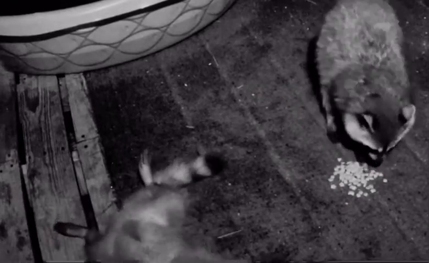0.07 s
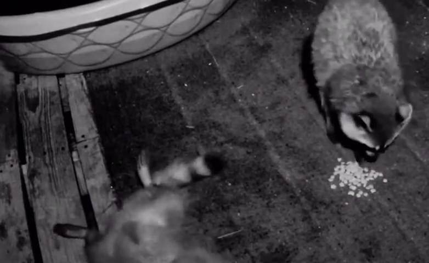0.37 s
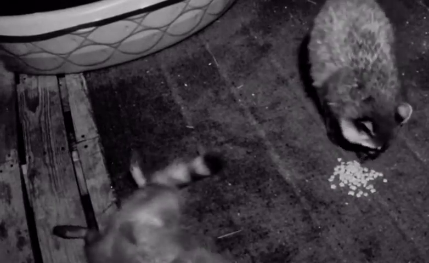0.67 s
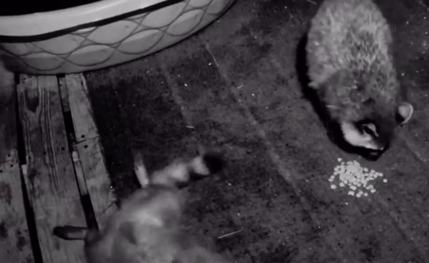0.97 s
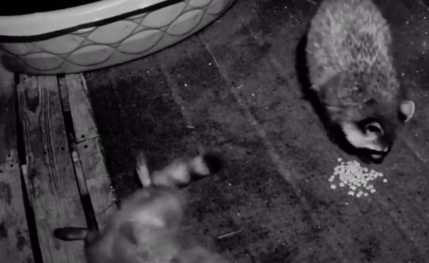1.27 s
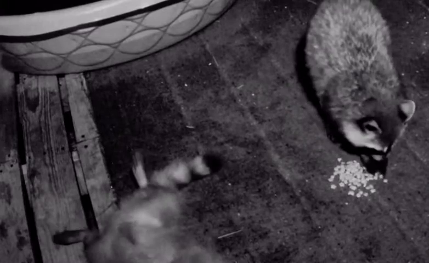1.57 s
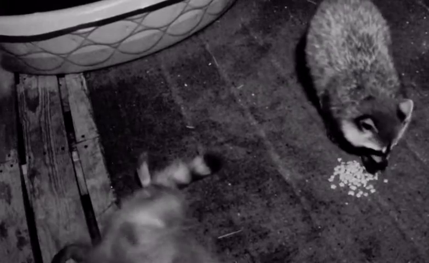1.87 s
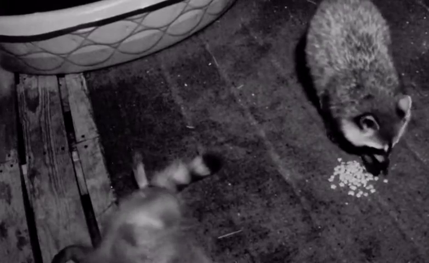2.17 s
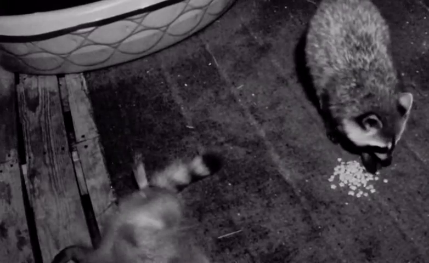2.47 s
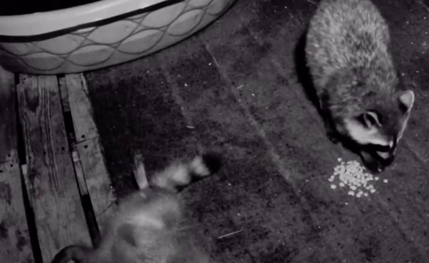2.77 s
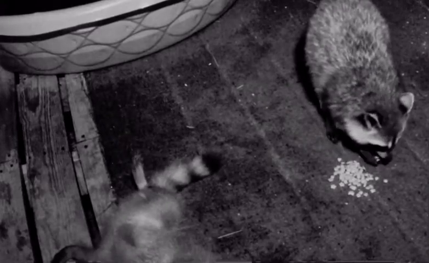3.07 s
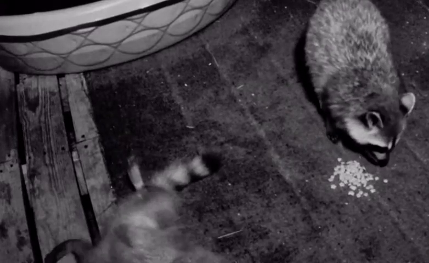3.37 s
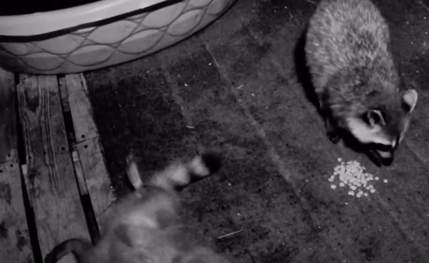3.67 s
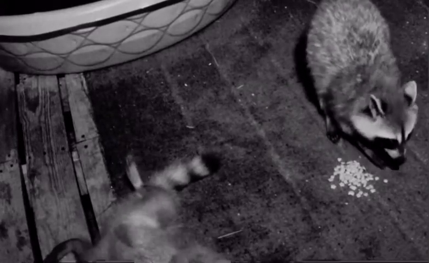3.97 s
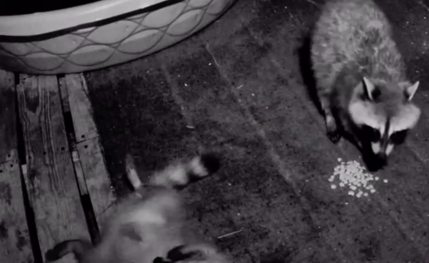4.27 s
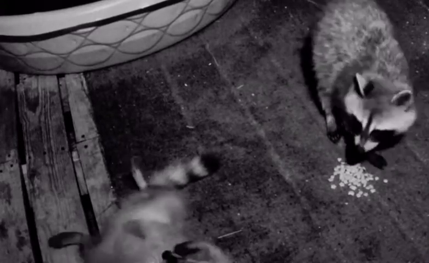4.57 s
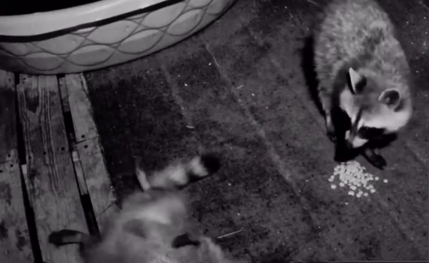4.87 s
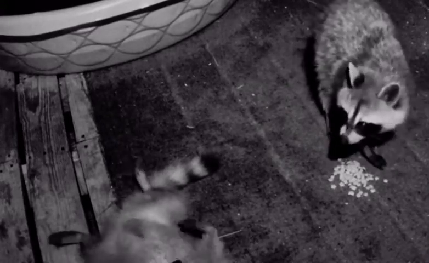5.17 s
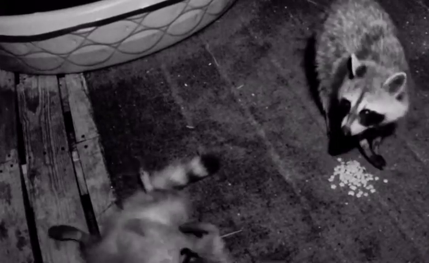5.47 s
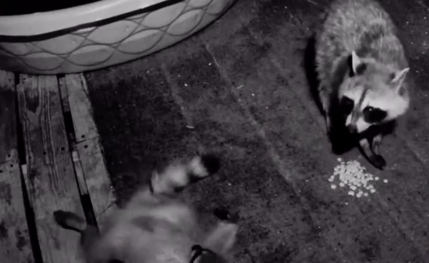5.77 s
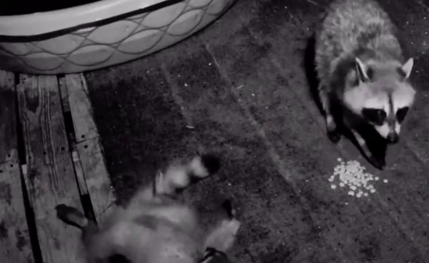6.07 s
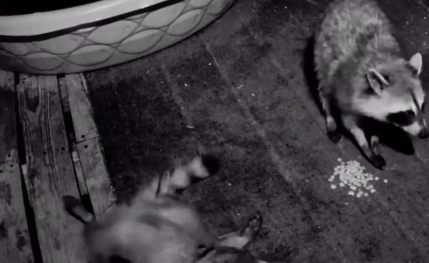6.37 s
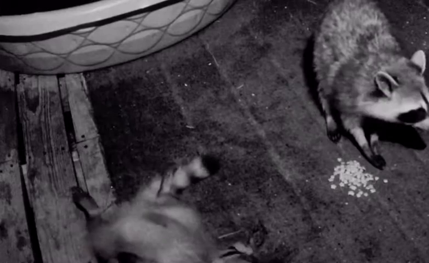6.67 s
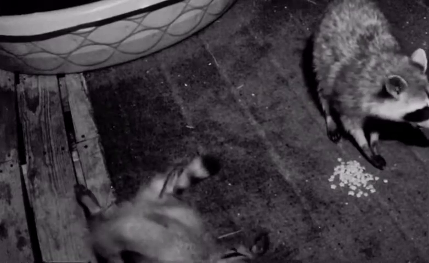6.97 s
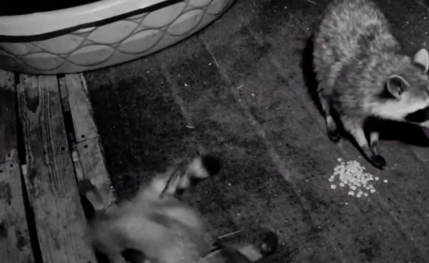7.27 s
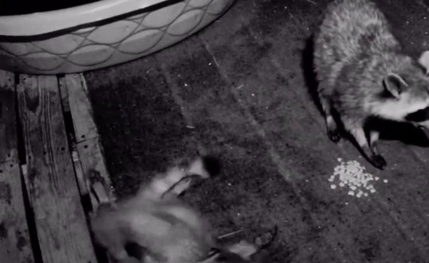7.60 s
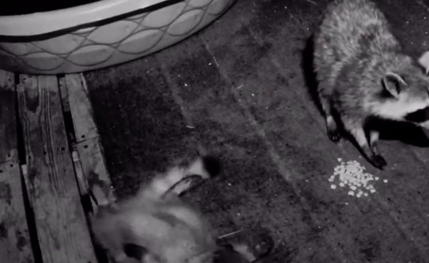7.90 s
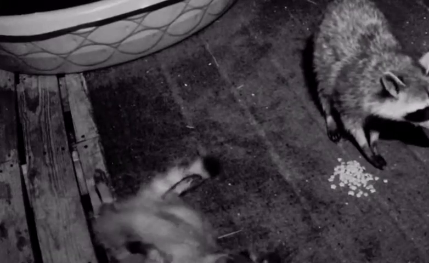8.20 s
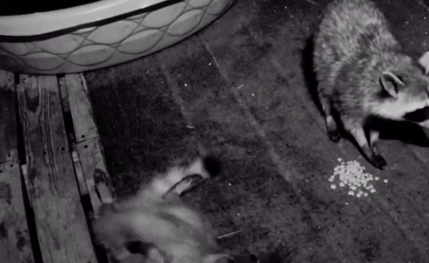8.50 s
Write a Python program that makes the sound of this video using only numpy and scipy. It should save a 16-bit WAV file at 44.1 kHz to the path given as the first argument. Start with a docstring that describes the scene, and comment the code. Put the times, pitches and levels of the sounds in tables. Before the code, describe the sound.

One sharp knock and a few soft bumps on wooden boards, with faint raccoon paw scuffs over a low fan hum and distant crickets.

```python
"""Two raccoons feeding on a wooden porch at night

One sharp knock and a few soft bumps ring in the boards. Paws and dry food scuff and crackle
faintly, in bursts of tiny clicks. A fan motor hums over a low rush of air, and two far crickets
chirp. Heard through a small camera microphone, the sound keeps cutting out for an instant."""
import sys
import numpy as np
from scipy import signal
from scipy.fft import rfft, irfft
from scipy.io import wavfile
from scipy.ndimage import uniform_filter1d

SR = 44100
rng = np.random.default_rng(int(sys.argv[2]) if len(sys.argv) > 2 else 0)


def generate_wav(sig):
    """Save sig (samples, or channels by samples) to the path in sys.argv[1] as 16-bit PCM at SR."""
    pcm = np.round(np.clip(np.atleast_2d(sig).T, -1, 1) * 32767).astype(np.int16)
    wavfile.write(sys.argv[1], SR, pcm)


N = 385434


def from_db(db):
    """Turn decibels (dB) into a number to multiply a sound by."""
    return 10 ** (np.asarray(db) / 20)


def rms_one(x):
    """Scale a sound so that its average strength (rms) is 1."""
    return x / np.sqrt(np.mean(x ** 2) + 1e-20)


def at_hz(points, hz):
    """Read between the rows of a frequency table, giving each octave equal room."""
    frequencies, values = np.transpose(points)
    return np.interp(np.log(np.maximum(hz, 1)), np.log(frequencies), values)


def keep_band(x, hz, kind, order=2):
    """Keep the "low" part of a sound, the "high" part or a "band" in between."""
    sos = signal.butter(order, np.clip(hz, 10, .45 * SR), kind, fs=SR, output="sos")
    return signal.sosfilt(sos, x)


def coloured(spectrum, size):
    """Noise of strength 1, with its balance of bass and treble set by a table."""
    white = rfft(rng.standard_normal(size))
    hz = np.arange(len(white)) * SR / size
    return rms_one(irfft(white * from_db(at_hz(spectrum, hz)), size))


def drift(rate):
    """A wandering curve that heads for a new random value `rate` times a second."""
    targets = rng.standard_normal(4000)
    return np.interp(np.arange(N) / SR * rate, np.arange(len(targets)), targets)


def fan(turns_per_s=56.06, housing_hz=1206, housing_width_hz=78, wander=0.001, flutter=0.2):
    """The rotor rubs once a turn, so its housing buzzes over mains hum and moving air."""
    # Tones of the buzz. Each row: vibrations per turn, level in dB.
    buzz_tones = [(2, -95), (17, -91.5), (20, -80.5), (21, -73), (22, -74.5), (23, -87), (24, -89),
                  (26, -92), (29, -87.5), (31, -86.5), (34, -92)]
    # Hum of the power supply. Each row: pitch in Hz, level in dB.
    mains_tones = [(60, -104), (120, -98.5)]
    # Rush of air. Each row: frequency in Hz, relative level in dB.
    air_spectrum = [(25, -29.5), (60, -18.5), (110, -10), (200, -4.5), (330, 3), (600, 0), (900, 0),
                    (1200, -0.5), (1450, -6.5), (2000, -11), (3500, -18), (5800, -17.5), (6600, -25),
                    (7400, -33.5)]
    t, buzz = np.arange(N) / SR, 0
    turns = np.cumsum(turns_per_s * (1 + wander * drift(9))) / SR
    for per_turn, db in buzz_tones:
        # The housing delays tones above its own pitch.
        lag = np.arctan(2 * (per_turn * turns_per_s - housing_hz) / housing_width_hz)
        unsteady = 1 + flutter * (drift(9) + 1j * drift(4.6))
        buzz += from_db(db) * np.real(unsteady * np.exp(1j * (2 * np.pi * per_turn * turns - lag)))
    mains = sum(from_db(db) * np.sin(2 * np.pi * hz * t) for hz, db in mains_tones)
    air = from_db(-69 + 0.43 * drift(8.5)) * coloured(air_spectrum, N)
    return np.sqrt(2) * (buzz + mains) + air


def cricket(bouts, hz, width_hz, length_s, db, note_hz, note_db, jitter_s=0.0065, echo_share=0.034):
    """Distance and leaves smear each chirp into a rough swell around the wing's note, plus echo."""
    def band(centre, width):
        """A narrow band of noise sounds like a rough tone."""
        edges = [centre - width / 2, centre + width / 2]
        return rms_one(keep_band(rng.standard_normal(N), edges, "band"))

    t = np.arange(N) / SR
    beats = np.concatenate([np.linspace(first, last, count) for first, last, count in bouts])
    chirps = beats + jitter_s * rng.standard_normal(len(beats))
    swell = sum(np.exp(-((t - s) / (length_s / 2)) ** 2) for s in chirps)
    tone = band(hz, width_hz) + from_db(note_db) * band(note_hz, 40)
    return from_db(db + 0.88 * drift(3.7)) * np.sqrt(np.minimum(swell, 1) + echo_share) * tone


def crickets():
    """Two crickets keep their own beats but grow louder and softer together."""
    # Runs of chirps, per cricket. Each row: first and last chirp in seconds, number of chirps.
    low_bouts = [(.16, 1.32, 5), (1.76, 2.56, 4), (2.98, 3.44, 3), (4.07, 6.04, 8), (6.52, 6.52, 1),
                 (7.2, 7.7, 3), (8.1, 8.64, 3)]
    high_bouts = [(.05, 1.0, 6), (1.39, 3.42, 13), (3.97, 6.56, 15), (6.97, 8.65, 11)]
    # How strongly they sing. Each row: time in seconds, change of level in dB.
    singing = [(0, -1.5), (2.6, -2), (4.5, 4.5), (5.8, 0.5), (8.74, -1)]
    low = cricket(low_bouts, hz=5006, width_hz=330, length_s=0.13, db=-83.5, note_hz=5100, note_db=-7.5)
    high = cricket(high_bouts, hz=5410, width_hz=420, length_s=0.11, db=-86, note_hz=5370, note_db=-1)
    effort = from_db(np.interp(np.arange(N) / SR, *np.transpose(singing)))
    return effort * (low + high)


def porch_echo(t, build_s=0.00059):
    """Sound bounces between deck and wall, building up fast and lasting longest in the bass."""
    # Tone of the echo. Each row: frequency in Hz, relative level in dB.
    spectrum = [(30, -27.5), (100, -23), (170, -10), (260, 6), (450, 1.5), (720, -5), (1100, 1.5),
                (2000, -4), (3000, -6.5), (3800, -17), (5500, -14), (7200, -10)]
    # Length of the echo. Each row: frequency in Hz, seconds to fade by 60 dB.
    fades = [(100, 1), (250, 0.26), (600, 0.29), (1500, 0.25), (3000, .2), (6000, 0.27)]
    noise, echo = rfft(coloured(spectrum, len(t))), 0
    hz = np.arange(len(noise)) * SR / len(t)
    centres, fade_times = np.transpose(fades)
    for share, fade_s in zip(np.eye(len(centres)), fade_times):
        band = irfft(noise * at_hz(np.c_[centres, share], hz), len(t))
        echo += band * from_db(-60 * t / fade_s)
    return echo * (1 - np.exp(-t / build_s))


def knocks(glide_s=0.0132, crack_s=0.0087, snap_s=0.0001, thud_band_hz=(40, 188)):
    """Each blow touches, hits and settles, making the boards crack and ring. Soft blows are dull."""
    # Tones of the boards. Each row: pitch in Hz, relative level in dB, seconds to fade by 60 dB.
    board_tones = [(107.6, -21, .34), (168.4, -14.5, 0.32), (248, -5.5, .29), (276, -3, 0.15),
                   (322, -1, .23), (403, -12.5, .22), (494.5, -8.5, 0.32), (565, -0.5, 0.14),
                   (872, -8, .15), (990, -1, 0.094), (1043, -7.5, 0.12), (1067, -8, 0.065),
                   (1310, -3, 0.26), (1306, -2, 0.091), (1625, -7.5, .15), (1732, -5, 0.14), (1925, 4, .14),
                   (2135, -5, 0.19), (2165, -12, 0.24), (2590, -17, .15), (2664, -11, .15),
                   (2995, -2.5, 0.13), (3080, -22.5, 0.19), (4170, -10, 0.13)]
    # Blows on the boards. Each row: start in seconds, level in dB, seconds from touch to main hit,
    # hardness from 0 to 1, share of the treble range kept at each next contact,
    # change to the crack in dB, change to the thud in dB.
    blows = [(0.1958, -55.5, 0.012, 0.62, 1, 0, -20), (2.5, -50.5, .016, 0.3, 0.61, -9, 0),
             (3.7021, -18.5, .0066, 0.95, 1.0, 0, -18.5), (4.493, -39, .019, 0.55, .58, -9.5, 6.5),
             (4.88, -53.5, .012, 0.28, .75, -14, -14)]
    # Touch, main hit and settling of a fully hard blow. Each row: delay (the main hit is at 1),
    # relative level in dB, lowest and highest Hz, change to the crack in dB, its starting Hz.
    contacts = [(0, 1, 1870, 4100, -1.5, 2878), (1, -0.4, 380, 4160, 0, 1657),
                (2.62, -9, 200, 2000, 5.5, 1660)]
    t, out = np.arange(SR // 2) / SR, np.zeros(N)
    ring = sum((-1) ** k * from_db(db - 60 * t / fade_s) * np.sin(2 * np.pi * hz * t)
               for k, (hz, db, fade_s) in enumerate(board_tones))
    snap = keep_band(np.exp(-t / snap_s), 500, "high")

    def body(low_hz, high_hz):
        """Ring and echo, in the range of pitches that a contact sets going."""
        sound = from_db(-18.5) * ring + from_db(-5.5) * porch_echo(t)
        return keep_band(keep_band(sound, low_hz, "high", order=1), high_hz, "low", order=4)

    def crack(start_hz, high_hz):
        """High bending waves outrun low ones in a plank, so the crack falls in pitch."""
        cycles = start_hz * glide_s * (1 - np.exp(-t / glide_s))
        bending = np.sin(2 * np.pi * cycles) * np.exp(-(t / crack_s) ** 4)
        click = keep_band(snap, 1.56 * high_hz, "low", order=4)
        return from_db(-4) * keep_band(bending, 184, "high") + from_db(2) * click

    for s, db, lag_s, hardness, kept, sharp_db, thud_db in blows:
        for k, (delay, contact_db, low_hz, high_hz, crack_db, crack_hz) in enumerate(contacts):
            bright = hardness * kept ** k
            sound = body(hardness * low_hz, bright * high_hz)
            sound += from_db(sharp_db + crack_db) * crack(bright * crack_hz, bright * high_hz)
            add(out, s + delay * lag_s, from_db(db + contact_db) * sound)
        # The whole deck gives under the main hit with a thud.
        add(out, s + lag_s, from_db(db + thud_db) * body(*thud_band_hz))
    return out


def add(out, s, sound):
    """Mix a sound in, starting at s seconds."""
    start = int(np.clip(round(s * SR), 0, N - 1))
    out[start:start + len(sound)] += sound[:N - start]


def crunch(length_s, hz, clicks_per_s=3000, spread_db=2.5, echo_fade_s=0.19, width=1.34):
    """A fading burst of tiny uneven clicks, blurred by the porch's echo."""
    t = np.arange(SR // 3) / SR
    clicks = (rng.random(len(t)) < clicks_per_s / SR) * rng.standard_normal(len(t))
    clicks *= from_db(spread_db * rng.standard_normal(len(t)))
    clicks *= np.clip(1 - t / length_s, 0, 1)
    tail = rng.standard_normal(len(t)) * from_db(-60 * t / echo_fade_s)
    echo = from_db(-27.5) * signal.fftconvolve(clicks, tail)[:len(t)]
    burst = keep_band(clicks + echo, [hz / width, hz * width], "band")
    return burst / np.sqrt(np.sum(burst ** 2) / (length_s * SR) + 1e-20)


def scuffs(rub_hz=1020):
    """A paw drags grit and food along and rubs the board beneath."""
    # Paw strokes. Each row: start and length in seconds, level of the grit in dB,
    # its middle pitch in Hz, level of the rub compared with the grit in dB.
    strokes = [(0.307, 0.06, -86, 6200, -3), (0.526, 0.043, -83.5, 3300, 3), (0.813, 0.062, -81.5, 3130, 8),
               (1.448, 0.069, -80, 2580, 3), (4.33, 0.038, -70.5, 3870, 10.5),
               (4.376, .065, -75, 4000, 9.5), (5.093, 0.0092, -69.5, 2820, 8), (6.959, 0.18, -76, 1680, -9),
               (7.062, 0.062, -74.5, 1810, -12), (7.768, 0.062, -80.5, 2200, -10)]
    out = np.zeros(N)
    for s, length_s, db, hz, rub_db in strokes:
        grit = crunch(length_s, hz)
        rub = from_db(rub_db) * crunch(length_s, rub_hz)
        add(out, s, from_db(db) * (grit + rub))
    return out


def chewing(start_s=5.22, end_s=6.6, bites_per_s=3, jitter_s=0.02, db=-86.5, uneven_db=1.5):
    """Bites of dry food make small crunches at a loose, steady pace."""
    out = np.zeros(N)
    for s in np.arange(start_s, end_s, 1 / bites_per_s):
        late, strong = rng.standard_normal(2)
        bite = crunch(length_s=0.066, hz=2700)
        add(out, s + jitter_s * late, from_db(db + uneven_db * strong) * bite)
    return out


def scene():
    """Everything on and around the porch, in one channel."""
    return (crickets() + knocks() + scuffs() + fan() + chewing())[None]


def record(dry, gap_s=0.01, gap_db=-26, cutoff_hz=7050, hiss_db=-99.5):
    """The sound drops out for instants, loses its highest treble and gains a faint hiss."""
    # Dropouts. Each number: the middle of one gap in seconds.
    gaps = [.081, .827, 1.984, 2.112, 2.633, 3.145, 3.532, 3.542, 3.984, 4.123, 4.73, 4.986, 5.182, 5.63,
            6.011, 6.275, 6.531, 6.787, 6.98, 7.234, 8.011]
    # Electronic hiss. Each row: frequency in Hz, relative level in dB.
    hiss_spectrum = [(100, -1.5), (12800, 3), (13300, -2), (15400, -4.5), (16000, -21)]
    gain = np.ones(N)
    for s in gaps:
        gain[round((s - gap_s / 2) * SR):round((s + gap_s / 2) * SR)] = from_db(gap_db)
    broken = dry * uniform_filter1d(gain, size=40)   # soften the edges of each gap
    dulled = signal.sosfilt(signal.cheby1(12, .2, cutoff_hz, fs=SR, output="sos"), broken)
    return dulled + from_db(hiss_db) * coloured(hiss_spectrum, N)


dry = scene()
out = record(dry)
generate_wav(out)
```